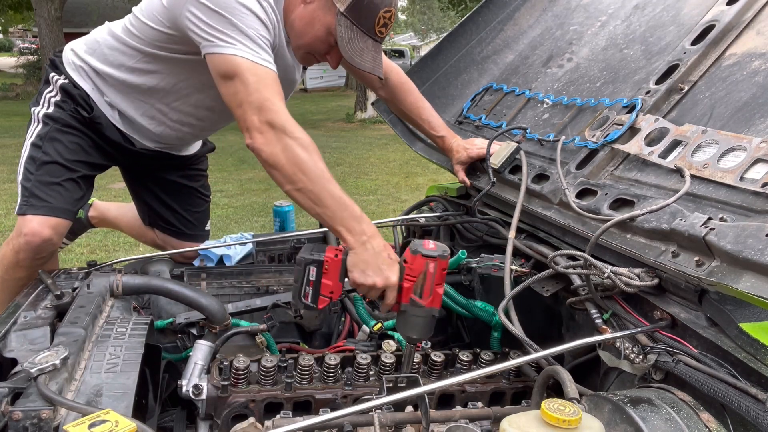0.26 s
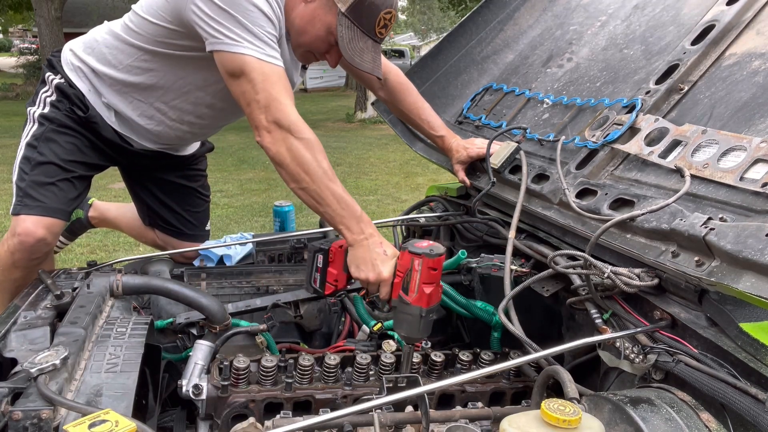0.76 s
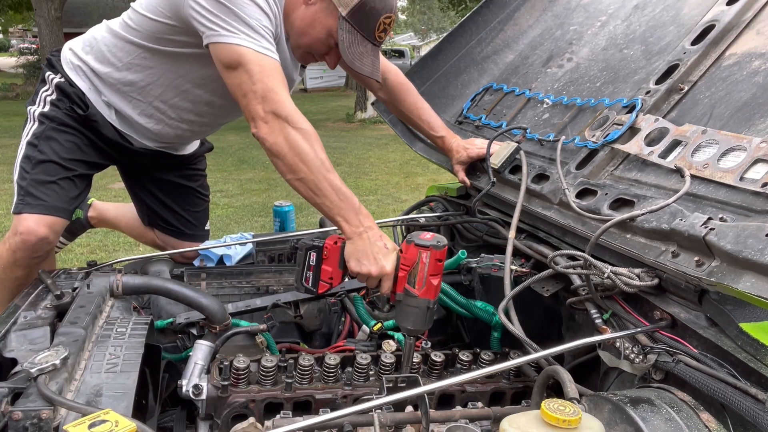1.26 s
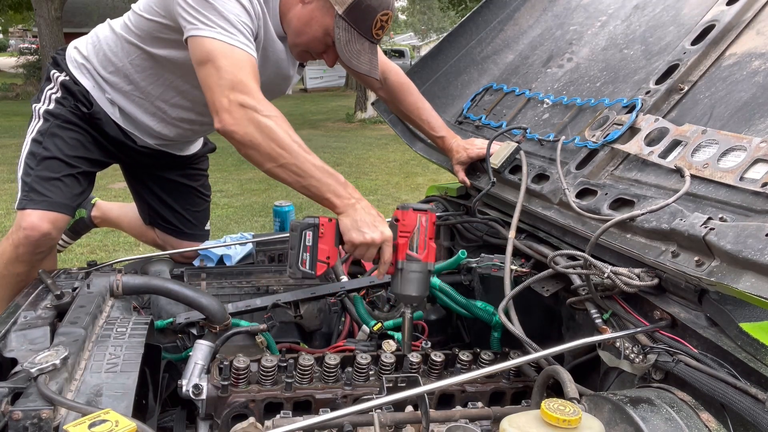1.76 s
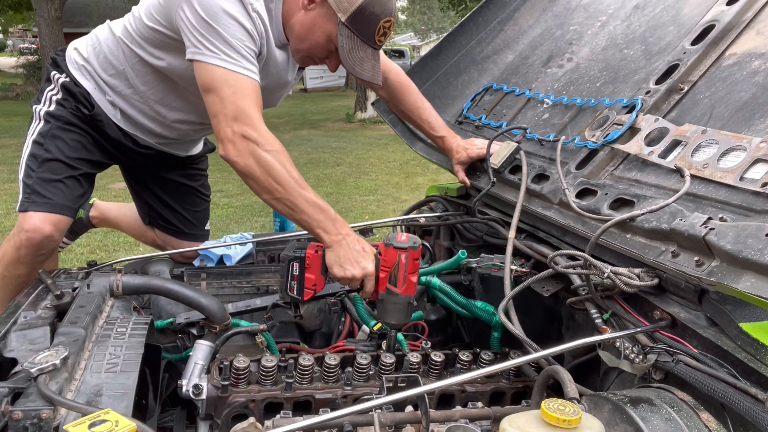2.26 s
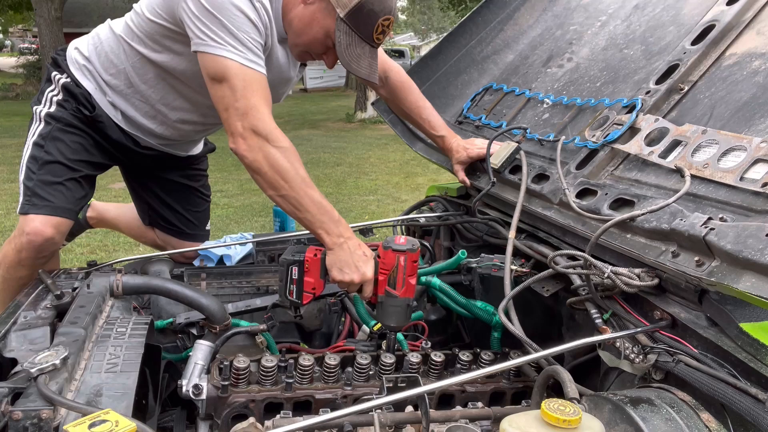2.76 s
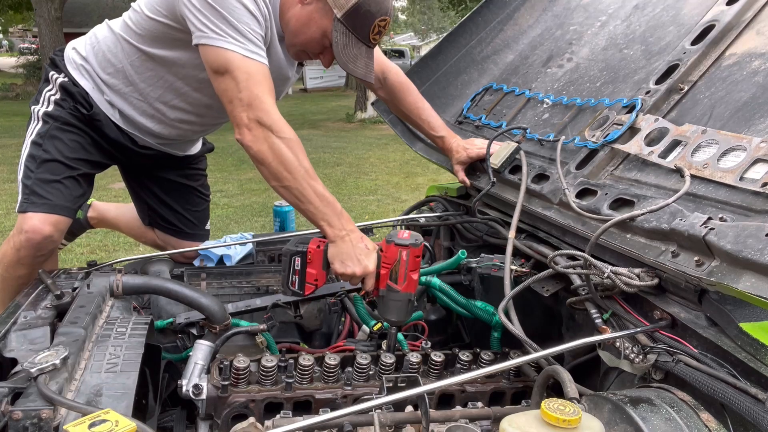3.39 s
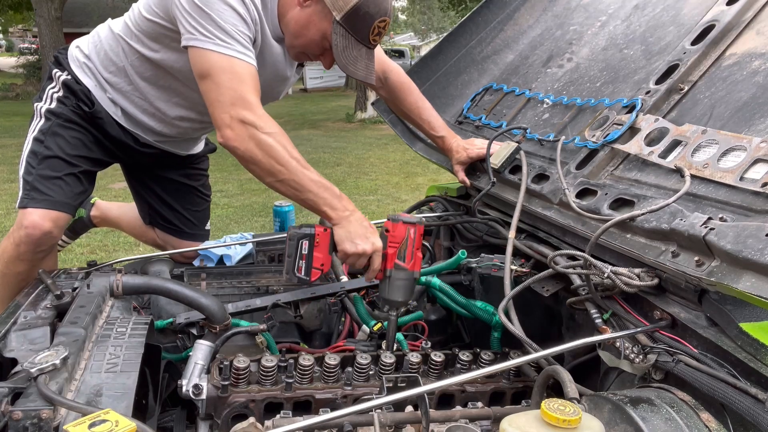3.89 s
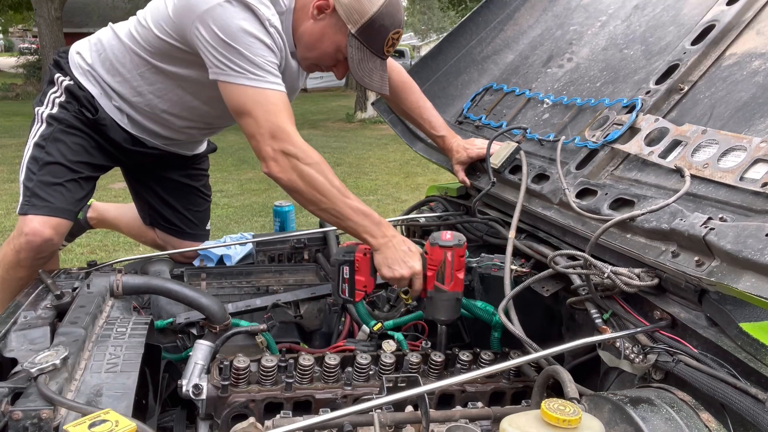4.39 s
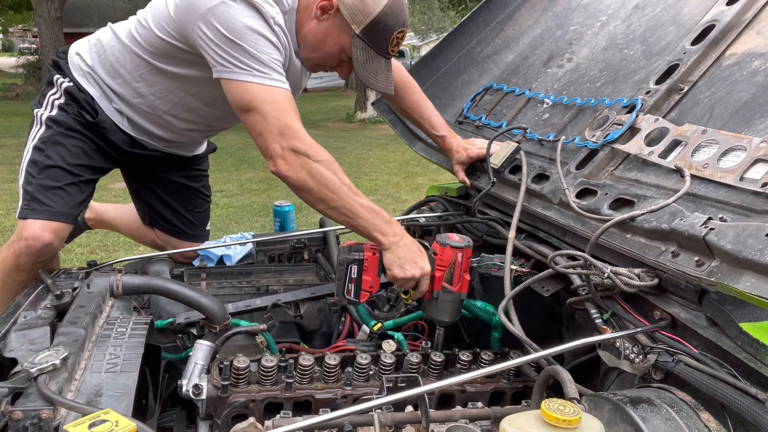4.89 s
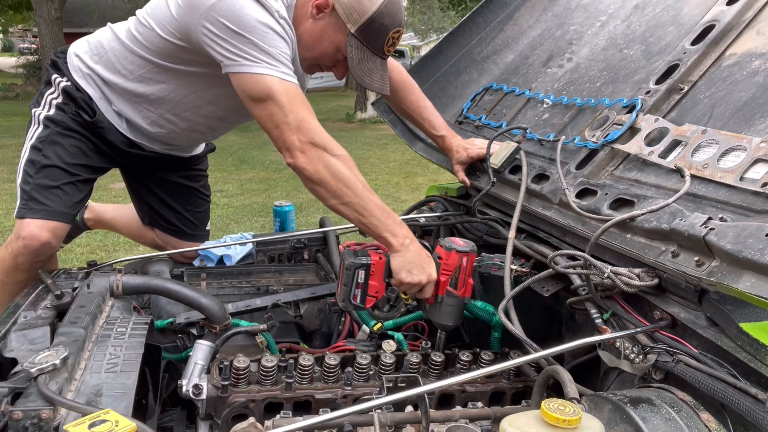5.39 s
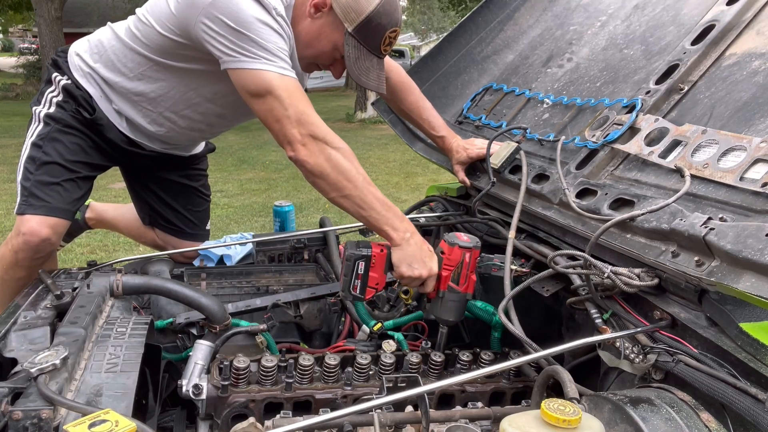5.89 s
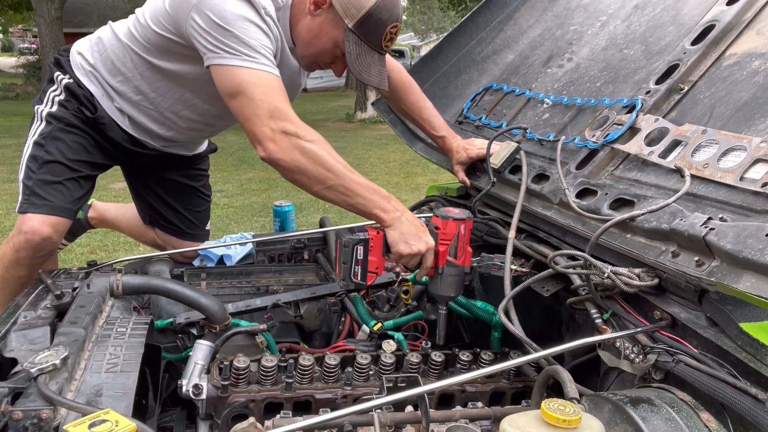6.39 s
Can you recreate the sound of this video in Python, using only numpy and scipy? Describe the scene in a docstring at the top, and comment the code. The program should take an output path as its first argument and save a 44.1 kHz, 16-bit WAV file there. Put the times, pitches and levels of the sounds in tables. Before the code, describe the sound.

A cordless impact wrench undoes three engine bolts outdoors, each a burst of hammering, rattle and whining spin-down, with clicks and faint drone between.

```python
"""In a yard outdoors, a cordless impact wrench undoes three bolts on an engine.
Each time it hammers (short steel strikes), spins the bolt out with a rattle and runs down (gear noise and whine).
Socket, tool and trigger knock and click between and during the pulls: noise and ringing modes that die away.
Two far machines drone (wavering tones), traffic and insects hiss (coloured noise), and a cricket
chirps (sliding tones)."""
import sys
import numpy as np
from scipy import signal
from scipy.fft import rfft, irfft
from scipy.io import wavfile
from scipy.ndimage import uniform_filter1d

SR = 44100
rng = np.random.default_rng(int(sys.argv[2]) if len(sys.argv) > 2 else 0)


def materialize(psi):
    """Save the field psi as 16-bit PCM at rate SR to the path in sys.argv[1].

    A 1-D psi becomes a single channel; in a 2-D psi each row is a channel.
    """
    bounded = np.clip(np.atleast_2d(psi).T, -1, 1)
    quanta = np.round(bounded * 32767).astype(np.int16)
    wavfile.write(sys.argv[1], SR, quanta)


N = 293265
T = np.arange(N) / SR  # s

# Strikes: time to fall 60 dB at ring factor 1 (s), for the noise and for the sharp clang
BODY_T60, TREBLE_T60 = 0.06, 0.095
CLANG_BODY_T60, CLANG_TREBLE_T60 = .022, .024
BONNET_S, BONNET_GAIN = .0016, .8  # the open bonnet throws the clang straight back
CLANG_SPREAD_DB, STRUCK_PART_DB = 4, 4  # modes wake unevenly; level of the part struck

# In steady hammering a lighter click runs ahead of each blow
STEADY_MIN_S, STEADY_MAX_S = .0265, .0305  # gaps between blows that count as steady
LEAD_S, LEAD_TREBLE_DB, LEAD_BODY_DB, LEAD_SPREAD_DB = .0086, -9.5, -9.5, 3
RATTLE_START_DB, RATTLE_GROW_S, RATTLE_SPREAD_DB, RATTLE_JITTER_S = -4, 0.11, 3, .001

# Motor speed, given as the rate at which gear teeth meet ("mesh"):
# at the pull, in the first blows, as the bolt comes free, and where the motor is last heard
PULL_HZ, LOADED_HZ, FREE_HZ, STOP_HZ = 2477, 3340, 3450, 1254.5
SPIN_UP_S, CLIMB_S = .085, .07
SAG_HZ_PER_S, BRAKE_HZ_PER_S = 2700, 16300
# Gear noise against the free run: faint, biting, spent by the last blow; a lull, then swelling back
PULL_DB, BITE_DB, FREE_DB, LULL_S, SWELL_S = -23, 1, -9, 0.057, 0.17
COAST_S, COAST_DB = .045, -12  # the last turns die away
RASP_DB = 3.5  # the braked gears rasp in the upper housing modes
WHINE_PULL_DB = -68
WHINE_BRAKE_DB, WHINE_STOP_DB = -15, -27.5  # drops as the brake bites and at the stop
SAG_TURN_S = 0.058  # the sagging whine changes level this long before the brake
# Second-stage tones against the gear noise: bolt just free, finger eased, under the brake, at the stop
STAGE_FREED_DB, STAGE_EASED_DB, STAGE_BRAKE_DB, STAGE_STOP_DB = -6, -3.5, 2.5, -3

NOTE_GAP_S = 0.041  # between cricket notes
EDGE_HZ = 15950  # upper limit of the whole sound


def amp(db):
    """Gain of a level in dB."""
    return 10 ** (np.asarray(db) / 20)


def evened(x):
    """Scales to an rms (average strength) of 1."""
    return x / np.sqrt(np.mean(x ** 2) + 1e-20)


def read(points, hz):
    """Reads between the points of a spectrum table on a log-frequency axis."""
    f, value = np.transpose(points)
    return np.interp(np.log(hz + 1), np.log(f + 1), value)


def colour(hz, spectrum, peaks):
    """Gain of a broad spectrum with resonances on top."""
    resonances_db = sum(db / (1 + (2 * (hz - f) / w) ** 2) for f, w, db in peaks)
    return amp(read(spectrum, hz) + resonances_db)


def add(mix, s, sound):
    """Mixes a two-row sound in at time s."""
    part = mix[:, round(s * SR):][:, :sound.shape[1]]
    part += sound[:, :part.shape[1]]


def fuzzy_line(hz, width, steady):
    """A tone on the curve hz: a steady part plus one that wanders within a width in Hz; two unrelated rows."""
    r = np.exp(-np.pi * width / SR)
    a, b = rng.standard_normal((2, 2, len(hz)))
    smooth = signal.lfilter([1], [1, -r], a + 1j * b)
    wander = signal.lfilter([1 - r], [1, -r], smooth)
    wander = wander / np.sqrt(np.mean(abs(wander) ** 2))
    wander = wander + steady * np.exp(2j * np.pi * rng.random((2, 1)))
    turning = np.exp(2j * np.pi * np.cumsum(hz) / SR)
    return evened((wander * turning).real)


def drones():
    """Two far machines: low wavering partials, nearly alike left and right."""
    # Each row: time in seconds, level of the first machine in dB, level of the second in dB;
    # each partial follows these swells by its own share.
    machine_levels = [(0, -47.5, -43.5), (.8, -49.5, -49.5), (1.2, -57, -55), (2.1, -71.5, -52),
                      (2.5, -59.5, -51.5), (3.5, -44, -59), (4.3, -57.5, -55.5), (4.7, -43, -54.5),
                      (5.4, -34.5, -55), (6.001, -41.5, -58.5), (6.45, -35.5, -49), (6.65, -50, -58.5)]
    # Each row: time in seconds, speed of the second machine as a factor.
    second_speed = [(0, 1.01), (.9, 1.), (1.2, 1.03), (2.2, 1.07), (2.6, 1.), (3.6, .96), (5.5, .97),
                    (6.65, 1.)]
    # Partials of the first machine. Each row: pitch in Hz, width in Hz, level in dB, share of the swell.
    first_lines = [(49, 4.7, -16.5, 0.5), (96.9, 5.4, -2, 0.51), (123.6, 11, -10.5, 0.28),
                   (195.5, 5.9, -11, .1)]
    # Partials of the second machine at speed 1. Each row: pitch in Hz, width in Hz, level in dB,
    # share of the swell.
    second_lines = [(75.3, 0.83, -1.5, 0.44), (152.8, 4.2, -4, 1.1)]
    s, *columns = np.transpose(machine_levels)
    first_db, second_db = (np.interp(T, s, c) for c in columns)
    speed = np.interp(T, *np.transpose(second_speed))
    out = 0
    for level_db, pace, lines in ((first_db, 1 + 0 * T, first_lines), (second_db, speed, second_lines)):
        mean_db = level_db.mean()
        for f, w, db, share in lines:
            gain = amp(mean_db + share * (level_db - mean_db) + db)
            out = out + gain * fuzzy_line(f * pace, w, steady=1.4)
    return out[0] + 0.21 * out[1] * np.array([[1], [-1]])


def yard():
    """Traffic wash and insect hiss: noise coloured in short frames, with drifting patches."""
    # Colour of the yard. Each row: frequency in Hz, relative level in dB per Hz.
    yard_colour = [(20, -34.5), (35, -22), (55, -3.5), (100, 5), (200, -3.5), (350, -7.5), (1000, -13.5),
                   (1700, -17.5), (3100, -25.5), (3800, -27.5), (4800, -24), (5900, -33), (7300, -31.5),
                   (8600, -46.5), (11000, -42), (16000, -54.5)]
    # Each row: frequency in Hz, likeness of left and right from -1 to 1.
    yard_alike = [(60, 0.7), (180, 0.82), (550, -0.13), (1650, -0.23), (4970, 0.08), (15000, -0.78)]
    # Each row: time in seconds, level in dB.
    yard_swell = [(0, -43.5), (.7, -47.5), (1.8, -52.5), (4.2, -53), (5.3, -47.5), (6.65, -54)]
    frames, hz = N // 256 + 5, np.fft.rfftfreq(1024, 1 / SR)
    a, b, c, d, patches = rng.standard_normal((frames, 513, 5)).T
    patches = evened(uniform_filter1d(uniform_filter1d(patches, 12, 0), 14, 1))
    same = np.clip(read(yard_alike, hz), -1, 1)[:, None]
    left = a + 1j * b
    right = same * left + np.sqrt(1 - same ** 2) * (c + 1j * d)
    z = np.array([left, right]) * amp(read(yard_colour, hz)[:, None] + 0.86 * patches)
    noise = signal.istft(z, nperseg=1024, noverlap=768)[1][:, :N]
    return amp(np.interp(T, *np.transpose(yard_swell))) * evened(noise)


def clang(t, lines, ring):
    """The sharp edge of a blow: modes start together and ring down; rows for body and treble, peak 1."""
    hz, db = np.transpose(lines)[:, :, None]
    low = hz[:, 0] < 2800
    hz = hz * rng.uniform(.96, 1.04, hz.shape)
    t60 = ring * np.where(hz < 2800, CLANG_BODY_T60, CLANG_TREBLE_T60)
    modes = amp(db - 16 * (hz < 1000) - 60 * t / t60) * np.sin(2 * np.pi * hz * t)
    rows = np.array([modes[low].sum(0), modes[~low].sum(0)])
    rows = rows + BONNET_GAIN * np.roll(rows, round(BONNET_S * SR), axis=1)
    return rows / abs(rows).max(1, keepdims=True)


def strikes(table, rise_s, body_db, treble_db, clang_body_db, clang_treble_db):
    """Short strikes: a sharp clang, and noise that builds fast; body, treble and top die at own speeds."""
    # Colour of the strikes as heard. Each row: frequency in Hz, relative level in dB per Hz.
    strike_colour = [(150, -8), (350, -7), (1000, -4), (1700, 2.5), (2400, -2.5), (3100, -4), (4500, 4),
                     (7200, 3), (9000, -17), (12500, -8.5), (16000, 1.5)]
    # Modes of the steel. Each row: pitch in Hz, width in Hz, level in dB before a random factor per blow.
    steel_modes = [(760, 250, 0), (1410, 250, 1), (1746, 190, -4.5), (2420, 29, 6.5), (3560, 310, 1.5),
                   (3930, 250, -5), (4370, 300, -4), (6130, 170, -4), (7250, 470, -2.5),
                   (10970, 3000, 12.5)]
    out, t = np.zeros((2, N)), np.arange(4096) / SR
    hz = np.fft.rfftfreq(len(t), 1 / SR)
    high = 1 / np.sqrt(1 + (2800 / (hz + 1)) ** 8)  # passes the treble
    top = 1 / np.sqrt(1 + (8500 / (hz + 1)) ** 8)  # passes the very top
    rise = (1 - np.exp(-t / rise_s)) ** 2
    for s, treble_peak_db, body_peak_db, *part in table:
        ring, struck = (part[0], [(part[1], STRUCK_PART_DB)]) if part else (1, [])
        clang_lines = [(f, CLANG_SPREAD_DB * rng.standard_normal()) for f, w, db in steel_modes[:-1]]
        low, ping = clang(t, clang_lines + struck, ring)
        low = amp(body_peak_db + clang_body_db) * low
        ping = amp(treble_peak_db + clang_treble_db) * ping
        add(out, s, np.ones((2, 1)) * (low + ping))

        # each blow lands elsewhere and wakes other modes
        woken = [(f, w, db * rng.uniform(0, 2.43)) for f, w, db in steel_modes]
        z = rfft(rng.standard_normal((2, len(t)))) * colour(hz, strike_colour, woken)
        body_fade = amp(-60 * t / (BODY_T60 * ring)) + .15 * amp(-60 * t / .12)
        body = evened(irfft(z * np.sqrt(1 - high ** 2))) * body_fade
        scale = np.sqrt(np.mean(irfft(z * high) ** 2))
        # a quick first drop, then the ring
        treble_fade = amp(-60 * t / (TREBLE_T60 * ring)) + 1.6 * amp(-60 * t / 0.031)
        treble = irfft(z * high * np.sqrt(1 - top ** 2)) + irfft(z * top) * amp(-60 * t / 0.032)
        treble = treble * treble_fade / scale
        noise = amp(body_peak_db + body_db) * body + amp(treble_peak_db + treble_db) * treble
        add(out, s - .0005, rise * noise)
    return out


def knocking():
    """Knocks and clicks of socket, tool and trigger, between and during the pulls: strikes of varied ring and pitch."""
    # Each row: time in seconds, treble level in dB, level under 2.8 kHz in dB (both before the shared
    # offsets below), ring length as a factor, rough pitch of the part struck in Hz.
    knocks = [(0.0543, -31, -39.5, 3.3, 1280), (0.0857, -33.5, -24, 0.99, 1260),
              (0.0955, -40, -33.5, 1.3, 1180), (0.2253, -37, -40.5, 1.2, 1290),
              (0.2375, -45, -48, 0.77, 600), (0.4031, -45, -38.5, 1.4, 1500), (0.416, -49, -40, 1.1, 1000),
              (0.455, -49.5, -52, 0.62, 2000), (0.5372, -33.5, -63, 5, 4430), (0.7153, -28, -55, 1.2, 4530),
              (1.7782, -30, -42.5, 1.44, 2520), (1.807, -33, -51, 1.3, 4400),
              (2.0398, -37, -53.5, 3.3, 4400), (2.293, -35, -44, 2.2, 1520), (2.3284, -25, -45, 0.48, 6400),
              (2.3338, -18.5, -40, 1.86, 5940), (2.3472, -22, -40, 0.46, 3670),
              (2.3507, -22, -22.5, 0.88, 1330), (2.5755, -50, -42, 0.8, 1500),
              (2.5882, -45, -29.5, 0.65, 1360), (2.7503, -46, -54, 0.96, 4410),
              (2.9512, -33, -47, 1.2, 4410), (3.9645, -34.5, -44, 1.5, 1970), (3.97, -48, -54, 0.43, 4600),
              (4.4362, -34, -43, 1.6, 1806), (4.464, -24, -45, 1.5, 6940),
              (4.4695, -25.5, -25.5, 1.25, 1290), (4.555, -33.5, -46.5, 2.7, 4400),
              (4.9062, -35, -41.5, 2.9, 1480), (4.963, -39, -60, .6, 7000), (4.977, -54, -48, 1.6, 1500),
              (5.012, -32.5, -46.5, 1.1, 1400), (5.0195, -37, -44.5, 1.5, 2310),
              (5.0761, -25.5, -45, 2.2, 6200), (5.0897, -29, -23.5, 0.8, 1440),
              (5.465, -30.5, -51, 1.4, 4447), (6.199, -23.5, -39.5, 0.84, 6515),
              (6.3871, -31.5, -43.5, 1.2, 1460), (6.4163, -39, -52, 2.1, 2700)]
    return strikes(knocks, 0.00099, -2, -15.5, clang_body_db=1.3, clang_treble_db=-7.0)


def pull(pull_s, free_s, ease_s, brake_s, top_hz, creep, gear_db, loaded_db, freed_db, spinning_db,
         top_db, sag_db, brake_db, lag_s, tones_db, grip_db):
    """One trigger pull: spins up into the load, climbs once the bolt is free, sags as the finger eases, brakes."""
    # Gear noise as the motor slows. Each row: mesh rate in Hz, level change in dB.
    slowing = [(1250, -21), (1500, -12), (1700, -8), (2100, -6), (2750, 0), (3250, -1.5), (3550, 0.3)]
    brake_hz = top_hz - SAG_HZ_PER_S * (brake_s - ease_s)
    stop_s = brake_s + (brake_hz - STOP_HZ) / BRAKE_HZ_PER_S
    t = np.arange(pull_s, stop_s + COAST_S, 1 / SR)
    spun_s = pull_s + SPIN_UP_S
    coast_db = COAST_DB * np.maximum(t - stop_s, 0) / COAST_S

    loaded_hz = np.interp(t, [pull_s, spun_s, free_s], [PULL_HZ, LOADED_HZ, FREE_HZ])
    aim_hz = top_hz - creep * np.maximum(ease_s - t, 0)
    climb_hz = aim_hz - (aim_hz - FREE_HZ) * np.exp(-np.maximum(t - free_s, 0) / CLIMB_S)
    falling_hz = np.interp(t, [ease_s, brake_s, stop_s], [top_hz, brake_hz, STOP_HZ])
    mesh_hz = np.where(t < free_s, loaded_hz, np.where(t < ease_s, climb_hz, falling_hz))

    noise_db = gear_db + np.interp(t, [pull_s, spun_s, free_s, free_s + LULL_S, free_s + SWELL_S],
                                   [PULL_DB, BITE_DB, FREE_DB, FREE_DB, 0])
    noise_db = noise_db + (t > ease_s) * np.interp(mesh_hz, *np.transpose(slowing))

    turn_s = brake_s - SAG_TURN_S
    whine_points = [
        (pull_s, WHINE_PULL_DB), (spun_s, loaded_db), (free_s - .05, loaded_db),
        (free_s + 0.029, freed_db), (free_s + lag_s - .06, freed_db), (free_s + lag_s, spinning_db),
        (ease_s, top_db), (turn_s, sag_db), (turn_s + 0.011, brake_db), (brake_s, brake_db),
        (brake_s + .025, brake_db + WHINE_BRAKE_DB), (stop_s, brake_db + WHINE_STOP_DB)]
    whine_db = np.interp(t, *np.transpose(whine_points))
    stage_points = [
        (free_s, STAGE_FREED_DB), (free_s + SWELL_S, tones_db), (ease_s, tones_db),
        (ease_s + .04, STAGE_EASED_DB), (brake_s, STAGE_BRAKE_DB),
        (brake_s + 0.039, STAGE_BRAKE_DB), (stop_s, STAGE_STOP_DB)]
    stage_db = np.interp(t, *np.transpose(stage_points))

    braking = np.clip((t - brake_s) / .03, 0, 1)
    sagging = np.clip((t - ease_s) / 0.12, 0, 1) * (1 - braking)
    return (t, mesh_hz, noise_db + coast_db, whine_db + coast_db, stage_db + 2 * coast_db,
            grip_db, sagging, braking)


def partials(table, mesh_hz, sagging, braking, idle_db):
    """Tones at multiples of the mesh rate that flicker; as speed falls, the housing shapes them more strongly."""
    # Resonances that lift the tones. Each row: pitch in Hz, width in Hz, lift in dB at 3450 Hz mesh
    # or faster; slower running strengthens it.
    whine_housing = [(905, 210, 9), (1890, 210.3, 14), (2316, 270, 5.5), (2611, 370, 16.5)]
    slack = np.maximum(3450 - mesh_hz, 0) / 1000  # kHz below the loaded speed
    lines = 0
    for k, db, width, sag_db, brake_db in table:
        line_hz = k * mesh_hz
        slow, quick = rng.standard_normal((2, len(mesh_hz)))
        idle_fade_db = slack * (idle_db - 0.01 * np.maximum(line_hz - 2900, 0))
        fade_db = sagging * sag_db + braking * brake_db + idle_fade_db
        flicker_db = 1.8 * evened(uniform_filter1d(uniform_filter1d(slow, 1200), 1200))
        chatter_db = 3 * braking * evened(uniform_filter1d(uniform_filter1d(quick, 260), 260))
        flat = [(1, 0), (2, 0)]
        lift = colour(line_hz, flat, whine_housing) ** (1 + .3 * np.minimum(slack, 1.2))
        gain = amp(db + fade_db + flicker_db + chatter_db) * lift
        lines = lines + gain * fuzzy_line(line_hz, width, steady=1.1)
    return lines


def motor(t, mesh_hz, noise_db, whine_db, stage_db, grip_db, sagging, braking):
    """Gear noise, throbbing with the shaft and duller as it slows, with the tones of both gear stages."""
    # Colour of the gear noise as heard. Each row: frequency in Hz, relative level in dB per Hz.
    gear_colour = [(150, -49.5), (350, -5.5), (700, -7.5), (1150, -3), (1800, -2), (3000, -4), (4500, -3.5),
                   (7500, -4.5), (9000, -27.5), (11500, -0.5), (13000, -21), (16000, -12)]
    # Resonances of the housing. Each row: pitch in Hz, width in Hz, lift in dB before the grip's tilt.
    housing = [(994, 140, 10), (1450, 180, 5), (1200, 240, 10.5), (1900, 150, 3), (2603, 350, 6)]
    # Partials of the whine. Each row: multiple of the mesh rate, level in dB before the housing's lift,
    # width in Hz, change while the speed sags in dB, change under the brake in dB.
    whine_lines = [(1., -4.5, 9.4, 0.5, -6), (2., -5, 15, 5, 3), (2.77, -13.5, 40, -2, -2),
                   (3., -9, 13, -1.5, 0)]
    # Tones of the second gear stage, which follow the gear noise. Each row: multiple of the mesh rate,
    # level in dB before the housing's lift, width in Hz, change while the speed sags in dB,
    # change under the brake in dB.
    stage_lines = [(.077, -27.5, 8, 1, -2), (.308, -15.5, 35, -2, -0.5), (.615, -18, 20, -11, -2),
                   (.77, -34, 30, 9, 6), (.923, -26.5, 25, 0, 3), (1.077, -40, 30, 0, 18),
                   (1.231, -17.5, 15, -2, -2), (1.385, -40.5, 30, 0, 21), (1.54, -17, 18, 0, -1),
                   (1.85, -24, 40, 0, -5)]
    mesh_hz = uniform_filter1d(mesh_hz, size=1200, mode="nearest")  # the rotor's inertia rounds every change
    hz, frames, z = signal.stft(rng.standard_normal((2, len(t))), SR, nperseg=256)
    frame_s, hz_column = frames + t[0], hz[:, None]

    grip = [(housing[0][0], 250, -grip_db / 2), (housing[1][0], 350, grip_db)]
    # slower teeth strike more softly
    corner_hz = np.maximum(4.2 * np.interp(frame_s, t, mesh_hz), 8000)
    patches = uniform_filter1d(rng.standard_normal(z.shape[1:]), size=4, axis=0)
    patches_db = 1.5 * evened(uniform_filter1d(patches, size=4, axis=1))
    z = z * colour(hz, gear_colour, list(housing) + grip)[:, None]
    z = z / (1 + (hz_column / corner_hz) ** 4) * amp(patches_db)
    rasp_db = RASP_DB * np.interp(frame_s, t, braking) / (1 + ((hz_column - 2300) / 700) ** 4)
    z = z * amp(rasp_db)

    shaft_hz = mesh_hz * stage_lines[0][0]
    throb_db = 1.6 * np.cos(2 * np.pi * np.cumsum(shaft_hz) / SR)
    rough_db = 1.6 * evened(uniform_filter1d(rng.standard_normal(len(t)) ** 3, 120))
    noise = signal.istft(z, SR, nperseg=256)[1][:, :len(t)]
    gears = evened(noise * amp(throb_db + rough_db))
    stage = amp(stage_db) * partials(stage_lines, mesh_hz, sagging, braking, idle_db=-3.0)
    whine = amp(whine_db) * partials(whine_lines, mesh_hz, sagging, braking, idle_db=-5.0)
    return t[0], amp(noise_db) * (gears + stage) + whine


def start(s, end_s, hz, db):
    """The housing sings for a moment as the trigger is pulled: a short rough tone that swells."""
    u = np.linspace(0, 1, round((end_s - s) * SR))
    swell = (.35 + .65 * u) * signal.windows.tukey(len(u), .2)
    return s, amp(db) * fuzzy_line(hz + 0 * u, 380, steady=.2) * swell


def hammering():
    """Hammer on anvil: every blow is a strike, with a lighter click ahead of those in steady stride."""
    # Each row: time in seconds, treble level in dB, level of the bolt and block under 2.8 kHz in dB
    # (both before the shared offsets below).
    blow_rows = [(0.7304, -18, -17.5), (0.758, -19, -16), (0.771, -14.5, -16), (0.784, -9, -33.5),
                 (0.8056, -13.5, -20.5), (0.8145, -13.5, -20.5), (0.845, -8.5, -24.5),
                 (0.8735, -11.5, -21.5), (0.902, -10, -18.5), (0.9304, -13, -26), (0.9582, -12.5, -27.5),
                 (0.9899, -11.5, -29.5), (2.9762, -16.5, -24.5), (3.0092, -25.5, -19), (3.02, -9, -18.5),
                 (3.0332, -9, -27.5), (3.0527, -23, -20), (3.058, -9.5, -23.5), (3.0655, -13.5, -22.5),
                 (3.0954, -9, -20), (3.122, -9.5, -23), (3.1517, -13, -24.5), (3.181, -12, -24),
                 (3.212, -10.5, -26), (5.5106, -22.5, -21), (5.538, -10, -19.5), (5.5626, -13.5, -21),
                 (5.57, -9, -29), (5.6, -9.5, -22.5), (5.6286, -12.5, -30), (5.657, -13, -23),
                 (5.6863, -12.5, -24.5), (5.718, -13.5, -26.5)]
    blows = np.array(blow_rows)
    gap = np.diff(blows[:, 0], prepend=0)
    spread_db = LEAD_SPREAD_DB * rng.standard_normal((len(blows), 1)) * [0, 1, 1]
    lead = blows + [-LEAD_S, LEAD_TREBLE_DB, LEAD_BODY_DB] + spread_db
    steady = (gap > STEADY_MIN_S) & (gap < STEADY_MAX_S)
    return strikes([*blows, *lead[steady]], 0.00051, -3.0, -10.0, clang_body_db=-4.0, clang_treble_db=-14)


def rattling():
    """The loose socket clicks twice, unevenly, on every turn, growing as the bolt loosens."""
    # Each row: first click in seconds, end in seconds, one turn in seconds, second click after the first
    # in seconds, treble level in dB, level under 2.8 kHz in dB (both before growth, spread and offsets).
    rattles = [(1.022, 1.3, 0.044, 0.017, -22.5, -41), (3.249, 3.65, 0.044, 0.016, -24, -36),
               (5.7637, 6.05, .0447, .0228, -25, -31)]
    rows = []
    for first_s, last_s, turn_s, second_s, treble_db, body_db in rattles:
        s = (first_s + turn_s * np.arange(10)[:, None] + [0, second_s]).ravel()
        jitter, a, b = rng.standard_normal((len(s), 3)).T
        grow_db = RATTLE_START_DB * np.maximum(1 - (s - first_s) / RATTLE_GROW_S, 0)
        click_treble_db = treble_db + grow_db + RATTLE_SPREAD_DB * a
        click_body_db = body_db + grow_db + 2 * RATTLE_SPREAD_DB * b  # the body varies twice as much
        clicks = np.transpose([s + RATTLE_JITTER_S * jitter, click_treble_db, click_body_db])
        rows += list(clicks[s < last_s])
    return strikes(rows, 0.00087, -11.5, -13.5, clang_body_db=-18, clang_treble_db=-7.5)


def cricket():
    """Short notes that slide down as the wing stroke slows."""
    # Phrases. Each row: first note in seconds, end in seconds, level in dB before the boost of each side.
    chirps = [(2.514, 2.74, -68.5), (4.049, 4.118, -75), (4.269, 4.389, -68.5), (4.728, 4.846, -65.5),
              (5.166, 5.276, -65), (6.451, 6.528, -69)]
    out, u = np.zeros((2, N)), np.linspace(0, 1, round(.028 * SR))
    note = np.sin(2 * np.pi * np.cumsum(4850 - 600 * u ** 1.5) / SR) * np.sin(np.pi * u) ** .8
    sides_db = np.array([[4.], [1.5]])  # left, right
    for first_s, end_s, db in chirps:
        for s in np.arange(first_s, end_s, NOTE_GAP_S):
            add(out, s - .005, amp(db + sides_db) * note)
    return out


def ports(rows):
    """Two microphone ports: right gets a shifted share of the left sound; the rest comes by other paths."""
    # Each row: frequency in Hz, phase by which right leads in radians, likeness from 0 to 1,
    # right minus left in dB.
    port_table = [(0, 0, 0.78, 1), (1680, 0.86, 0.93, 1), (2680, 2, 0.1, 0.8), (4100, 1.5, 0.99, 2.5),
                  (6060, 3.5, 0.3, -1.5), (8140, 5, 1, -3), (9260, -2.5, 0.9, 5), (11870, 5.5, 0.7, -1),
                  (14500, -4.5, 0.99, -4), (15580, -2.5, .7, 9)]
    hz = np.fft.rfftfreq(N, 1 / SR)
    f, *columns = np.transpose(port_table)
    lead, alike, db = (np.interp(hz, f, c) for c in columns)
    alike = np.clip(alike, 0, 1)
    a, b = rfft(rows)
    right = alike * a * np.exp(1j * lead) + np.sqrt(1 - alike ** 2) * b
    return irfft([a * amp(-db / 2), right * amp(db / 2)], N)


def scene():
    """The tool through the port pair, over the yard."""
    # One row a pull of the trigger. Each row: pull in seconds, bolt comes free in seconds, finger eases in
    # seconds, brake in seconds, top mesh rate in Hz, creep up to it in Hz per second, gear noise in dB,
    # whine in dB while hammering, just after, spinning out, at top speed, sagging and at the brake,
    # delay of the whine after the bolt frees in seconds, second-stage tones against the gear noise in dB,
    # tilt by the grip in dB (added to the second housing resonance listed, half of it taken off the first).
    runs = [(.69, 0.999, 1.5, 1.603, 3855, 420, -36, -52, -64, -41, -37.5, -42, -42, .3, 0, -2),
            (2.94, 3.219, 3.685, 3.815, 3707, 10, -35, -56, -50, -40, -39, -41, -47, .38, -4, -1),
            (5.45, 5.73, 6.07, 6.24, 3690, 10, -35, -60, -56, -52, -46, -44, -35, .27, -3, 5)]
    # Singing of the housing. Each row: start in seconds, end in seconds, pitch in Hz, level in dB
    # before the swell.
    starts = [(0.709, 0.733, 2593, -36), (2.952, 3.011, 2810, -36.5), (5.465, 5.515, 2704, -33.5)]
    tool = hammering() + rattling() + knocking()
    for row in runs:
        add(tool, *motor(*pull(*row)))
    for row in starts:
        add(tool, *start(*row))
    return ports(tool) + drones() + yard() + cricket()


def record(dry):
    """A gain control on the bass turns it down while the sound is loud; then the band limit."""
    power = uniform_filter1d((dry ** 2).mean(0), 3000, origin=1400)
    power_db = 10 * np.log10(abs(power) + 1e-12)
    fall = T * 25.0  # recovers at this many dB a second
    held_db = np.maximum.accumulate(power_db + fall) - fall
    over_db = np.maximum(held_db + 36.0, 0)  # dB above the threshold of -36
    bass = signal.oaconvolve(dry, signal.firwin(2047, 135, fs=SR)[None], "same")
    ducked = dry - bass * (1 - amp(-1.1 * uniform_filter1d(over_db, 2000)))
    band_limit = signal.firwin(511, EDGE_HZ, window=("kaiser", 9), fs=SR)
    return signal.oaconvolve(ducked, band_limit[None], "same")


dry = scene()
out = record(dry)
materialize(out)
```